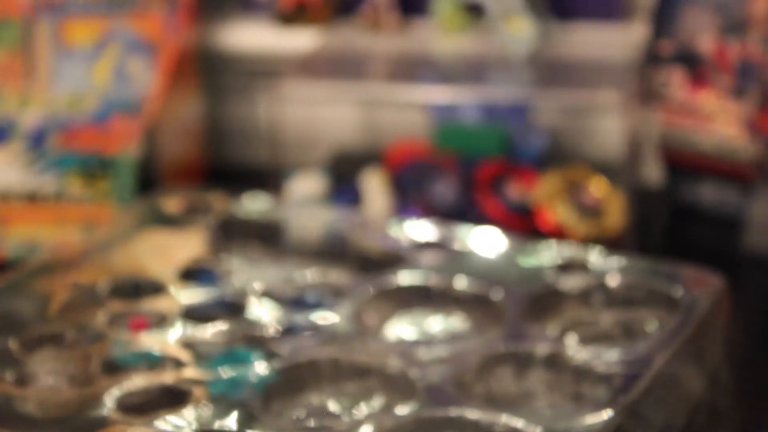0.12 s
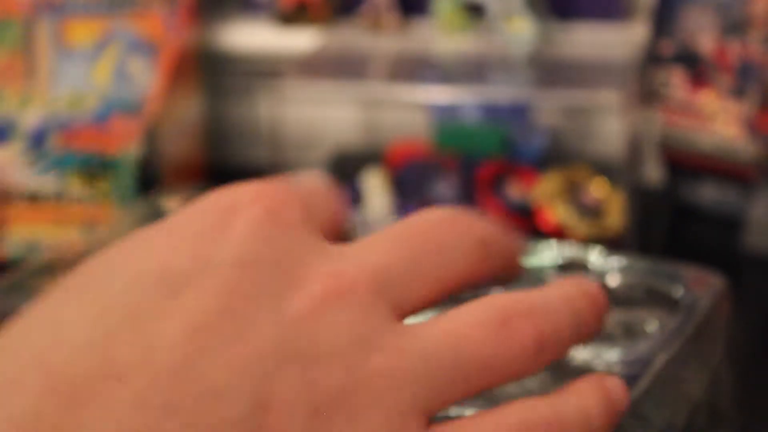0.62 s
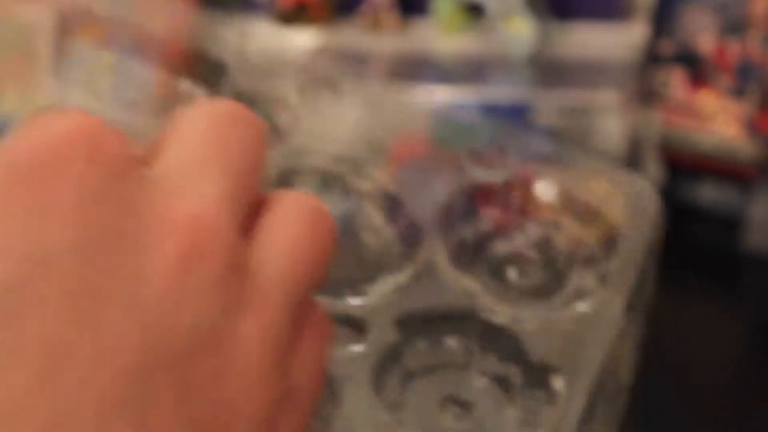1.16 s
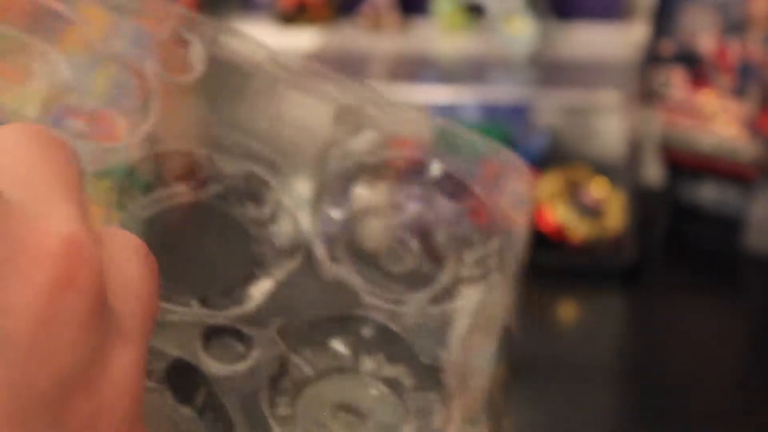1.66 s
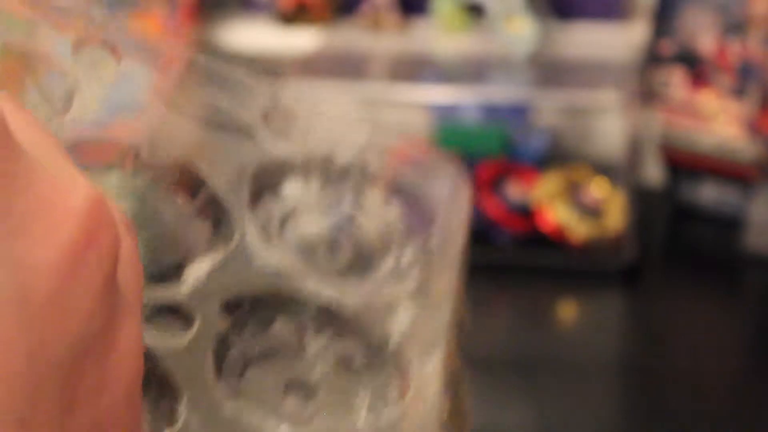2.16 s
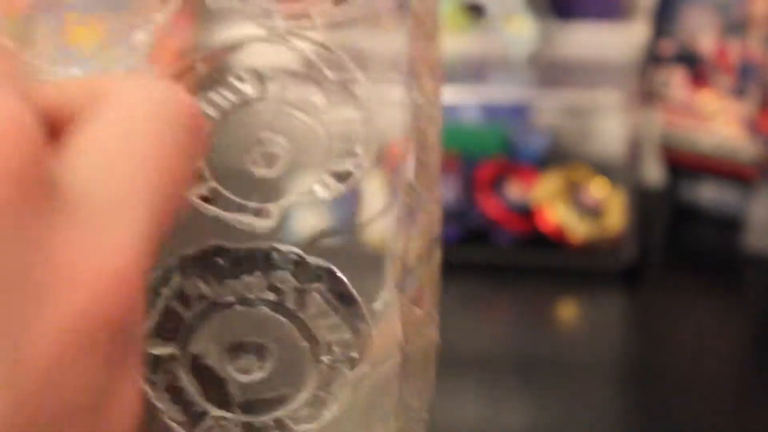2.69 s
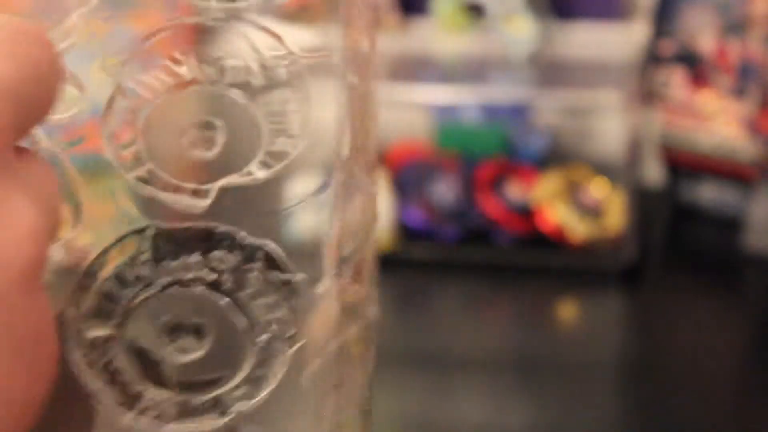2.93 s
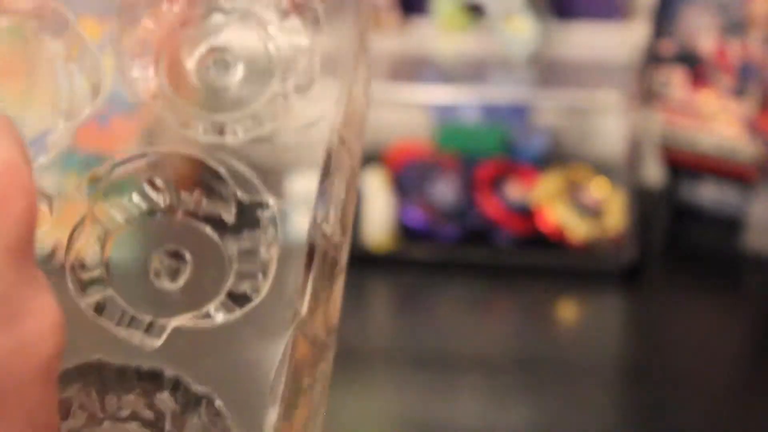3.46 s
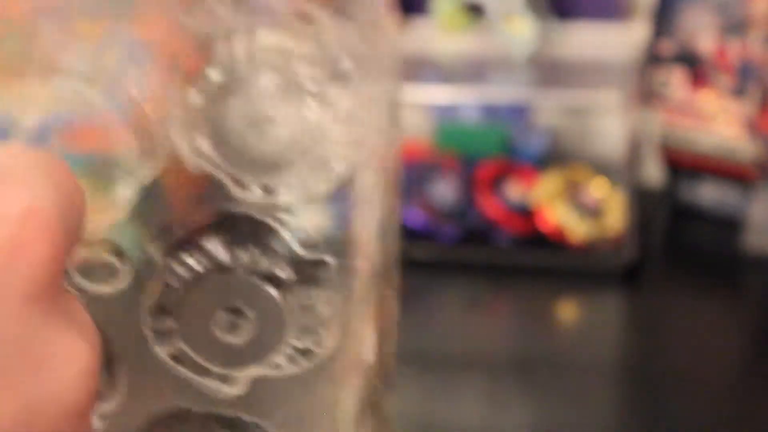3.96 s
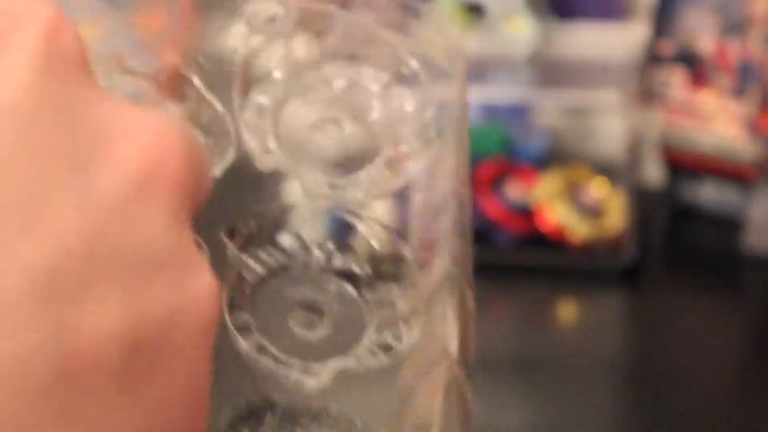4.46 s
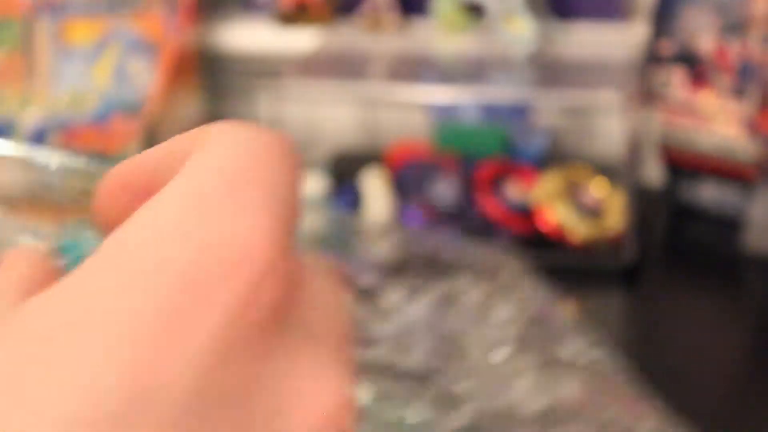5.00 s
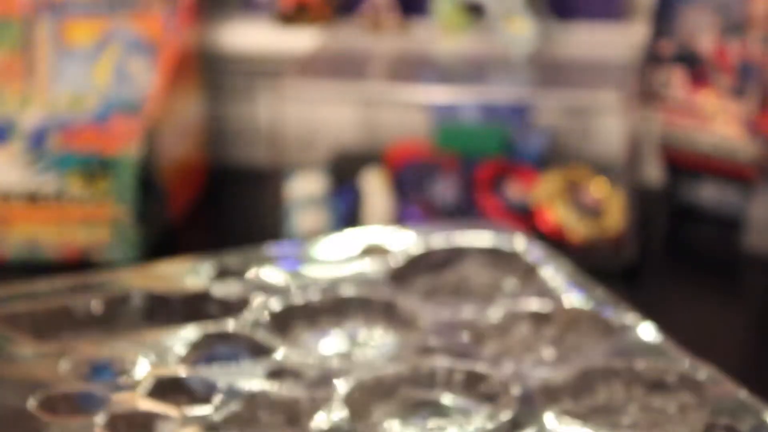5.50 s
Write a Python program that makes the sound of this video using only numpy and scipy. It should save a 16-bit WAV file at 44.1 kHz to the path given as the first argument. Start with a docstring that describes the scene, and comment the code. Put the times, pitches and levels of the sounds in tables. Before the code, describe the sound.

Thin moulded plastic tray is gripped, flexed and tilted close up, with bright snaps, hollow knocks, squeaky rubbing and a clattering set-down over faint hiss.

```python
"""Bright snaps, dull booming knocks and ticks are heard over rubbing and squeaks, with a hiss behind them.
A thin moulded plastic tray is gripped, tilted, flexed and set down on a table, close to a camera in a small room.
Each blow is a push and a burst of noise ringing in the tray; fingers and skin are noise broken into jerks.
The camera adds its hiss, turns its gain down after loud blows and flattens the highest peaks."""
import sys
import numpy as np
from scipy import signal
from scipy.fft import rfft, irfft, next_fast_len
from scipy.io import wavfile
from scipy.ndimage import uniform_filter1d, minimum_filter1d, map_coordinates

SR = 44100
rng = np.random.default_rng(int(sys.argv[2]) if len(sys.argv) > 2 else 0)


def linear_from_db(decibels):
    """Turn decibels (scalar or array-like) into linear amplitude factors; 0 gives 1."""
    return 10 ** (np.asarray(decibels, float) / 20)


def generate_wav(signal):
    """Clip the signal to [-1, 1] and save it as 16-bit WAV at the path in sys.argv[1]."""
    frames = np.transpose(np.atleast_2d(signal))
    scaled = np.clip(frames, -1, 1) * 32767
    pcm = np.round(scaled).astype(np.int16)
    wavfile.write(sys.argv[1], SR, pcm)


N = 247920

# Dents that buckle with a bright snap. Each row: start in seconds, crack level in dB,
# boom in dB above the crack, sizzle in dB above the crack, pitch of the dent in Hz.
SNAPS = [(0.084, -15.5, -1.5, -7.5, 1300), (0.2768, -29, 2.5, 0, 7540), (0.2871, -21.5, -12, -5, 2100),
         (0.2893, -10.5, -14, -1, 3080), (0.3246, -12.5, -10.5, -0.5, 3120), (1.141, -10.5, -23, -16, 3650),
         (1.2372, 0.5, 5.5, -13, 3650), (1.6078, -23.5, 4, -9.5, 1660), (1.7708, -34, 3, -9, 4310),
         (1.885, -7.5, -4, -0.5, 5600), (1.9663, -6, 9, 5.5, 4170), (2.637, -18.5, -2, -2, 2004),
         (2.6717, -16, 2, -3, 2450), (3.2674, -28.5, 9, -9, 1790), (3.471, -24.5, -10, -16, 2030),
         (3.6633, 0, 4, -8, 1120), (3.9015, -16.5, 5, 0, 6100), (3.9127, -6.5, 4, -11.5, 2200),
         (4.0515, -23.5, 8, 1.5, 1270), (4.0796, -13.5, -1, -14, 2600), (4.1988, -26, 8, -11, 2550),
         (4.2445, -19.5, 6.5, -9, 2560), (4.383, -30.5, 4, -4, 1440), (5.1316, -16.5, -11, 3, 2910),
         (5.5183, -19, 16.5, -3, 1360)]
# Duller contacts of parts, fingers and table, from ticks to scuffs. Each row: start in seconds, crack level in dB,
# boom in dB above the crack, pitch in Hz, rough time in seconds for the burst to die by 60 dB.
KNOCKS = [(0.7863, -30.5, 15, 1290, .086), (0.8024, -18, 13.5, 1180, 0.044),
          (0.8385, -34, 22.5, 1120, 0.044), (0.8741, -40, 12, 1250, .057), (0.9158, -20, 7.5, 4450, .066),
          (0.9264, -14.5, 3.5, 3370, 0.08), (0.9384, -12, -2.5, 1280, 0.072),
          (0.9666, -21.5, 1.5, 1196, 0.099), (1.0442, -30.5, 11.5, 1400, 0.15),
          (1.077, -24.5, 2, 1890, 0.061), (1.1366, -23, -16, 4000, .054), (1.1792, -20, 3.5, 1370, 0.049),
          (1.335, -15, -7, 2130, .082), (1.347, -10, 3.5, 2080, 0.04), (1.3753, -14, 2.5, 1980, .047),
          (1.39, -21.5, 13.5, 2570, 0.033), (1.6574, -33.5, 14, 1270, 0.038),
          (1.8288, -18.5, 5.5, 2000, 0.043), (2.1306, -18.5, -6, 5200, 0.11),
          (2.455, -25, 7.5, 5350, 0.046), (2.4845, -21, -3, 2180, 0.053), (2.846, -29, 3.5, 2050, 0.066),
          (2.8666, -27, 1.1, 2050, 0.043), (2.881, -24.5, 3.5, 1970, 0.087), (2.911, -26, 7.5, 3220, .026),
          (2.948, -26, 2.5, 3220, 0.025), (2.9942, -32, -17, 3300, 0.035), (3.0489, -26.5, -2, 2520, 0.016),
          (3.0764, -29, 4, 2970, 0.027), (3.158, -37, 1, 2120, .035), (3.1831, -23, -0.5, 2580, 0.027),
          (3.1903, -21.5, -5, 4050, .011), (3.203, -20.5, -20, 1360, 0.033), (3.2206, -18, -15, 1300, .015),
          (3.2368, -31, 8, 1720, 0.054), (3.344, -43, 18, 1120, 0.042), (3.4033, -27, 6, 3000, 0.024),
          (3.4209, -29.5, 8, 2700, 0.048), (3.4849, -21.5, -6.5, 3600, .015),
          (3.5243, -28.5, 8.5, 1370, 0.054), (3.5326, -19.5, -13, 1290, .025),
          (3.5488, -17.5, -9, 2060, 0.04), (3.5612, -17, -3.5, 4300, .014), (3.582, -8.5, -8, 4200, 0.02),
          (3.6097, -10, -3.3, 4160, 0.018), (3.6337, -14, -14, 2120, .026),
          (3.715, -2.5, -7.5, 2190, 0.016), (3.794, -25, -4, 1370, .034), (3.8544, -40, 18, 2430, .028),
          (3.874, -26.5, 10, 1100, 0.16), (3.985, -39, 17, 1120, 0.029), (4.0687, -18.5, 4, 3900, 0.039),
          (4.6676, -31, -1, 1940, 0.029), (4.73, -29.5, -4.5, 2150, 0.042), (4.8296, -23, -11, 2100, 0.019),
          (4.8409, -34, -10, 3340, 0.031), (4.9062, -11.5, 3.5, 1490, 0.1), (4.9652, -19, 4.5, 4300, 0.019),
          (5.0434, -9, 6.5, 1950, 0.045), (5.0696, -23, 13.5, 3540, 0.12), (5.0992, -13, 1.5, 3000, .082),
          (5.1812, -14, -13, 3160, 0.098), (5.2075, -14, 3.5, 3200, 0.097), (5.1587, -19, -2, 1890, 0.046),
          (5.2274, -19, 5, 1360, 0.022), (5.2654, -19, 8.5, 1400, 0.079), (5.3343, -16.5, 8.5, 1830, 0.06),
          (5.369, -26, 21.5, 1270, 0.025), (5.3894, -24.5, 20.5, 1120, 0.064), (5.443, -12, 14, 2280, .032),
          (5.4536, -13, 13, 1120, 0.034), (5.4824, -16, 17.5, 1180, 0.09)]
# The hands at work. Each row: time in seconds, flexing level in dB, rubbing level in dB.
HANDS = [(.76, -90, -90), (.8, -31, -39.5), (.966, -16, -26), (1.13, -33.5, -45.5), (1.3, -19, -27),
         (1.42, -29, -44.5), (1.8, -24, -28), (1.95, -35.5, -30), (2.14, -29, -24.5), (2.29, -34, -39),
         (2.66, -31, -30.5), (2.8, -41, -46), (2.95, -43.5, -51), (3.14, -38.5, -47.5), (3.224, -27, -30.5),
         (3.45, -45.5, -87), (3.53, -32, -37), (3.97, -34, -52), (4.2, -34, -51), (4.36, -48.5, -74),
         (4.68, -42.5, -42), (5.02, -39, -45), (5.06, -15, -29.5), (5.13, -17.5, -14.5), (5.29, -12, -32),
         (5.32, -25, -25.5), (5.39, -7.5, -42), (5.5, 0, -24.5), (5.62, -25, -44)]
# Resonances of the moulded ribs under the fingers. Each row: pitch in Hz, width in Hz, relative level in dB.
RIBS = [(1350, 674, 6.5), (2150, 405, 6.5), (2620, 115, 6.5), (3650, 1870, 0.5), (4075, 250, 4.5),
        (4830, 400, -9), (5600, 990, -3.5), (7450, 1400, -17.5)]


def unit(x):
    """Scales to rms 1 along the last axis."""
    return x / np.sqrt(np.mean(x ** 2, axis=-1, keepdims=True) + 1e-20)


def along(points, hz):
    """Reads a curve of (Hz, value) points on a log frequency axis."""
    f, v = np.transpose(points)
    return np.interp(np.log(hz + 1), np.log(f + 1), v)


def filtered(x, response):
    """Shapes the spectrum of x by a response that is a function of frequency."""
    m = next_fast_len(x.shape[-1] + SR // 8)
    spectrum = rfft(x, m) * response(np.fft.rfftfreq(m, 1 / SR))
    return irfft(spectrum, m)[..., :x.shape[-1]]


def resonance(f, hz, width):
    """One resonance that rings only after it is struck."""
    return 1j * f * width / (hz * hz - f * f + 1j * f * width)


def body(modes):
    """Sums the resonances of a body, their signs alternating."""
    return lambda f: sum((-1) ** k * linear_from_db(db) * resonance(f, hz, w) for k, (hz, w, db) in enumerate(modes))


def wobble(rate):
    """A smooth random curve through so many random points a second."""
    points = rng.standard_normal(int(N * rate / SR) + 4)
    return map_coordinates(points, [np.arange(N) * rate / SR])


def slips(rate, spread_db, life):
    """Stick-slip: jerks of uneven size, so many a second, each dying away over its life in seconds."""
    size_db = np.minimum(spread_db * rng.exponential(size=N), 3 * spread_db)
    jerks = (rng.random(N) < rate / SR) * linear_from_db(size_db)
    return unit(signal.lfilter([1], [1, -np.exp(-1 / (life * SR))], jerks))


def patchy(x, depth_db):
    """Fine resonances that drift as the contact moves."""
    z = signal.stft(x, nperseg=512)[2]
    field = uniform_filter1d(rng.standard_normal(z.shape), size=3, axis=0)  # smooth over pitch
    field = uniform_filter1d(field, size=24, axis=1)  # smooth over time
    return signal.istft(z * linear_from_db(depth_db * field / field.std()), nperseg=512)[1][:N]


def course(rows):
    """One value per sample for each column after the time."""
    s, *columns = np.transpose(rows)
    return [np.interp(np.arange(N) / SR, s, c) for c in columns]


def swell(start, loudest, end, db):
    """A glide rises to its peak, sinks and fades out."""
    edge_db = -11.5  # both ends against the peak
    now = np.arange(N) / SR
    fade = np.interp(now, [start - .03, start, end, end + 0.026], [0, 1, 1, 0])
    return fade * linear_from_db(db + np.interp(now, [start, loudest, end], [edge_db, 0, edge_db]))


def tails(count):
    """Room answers of energy 1, a few ms late, each frequency dying at its own speed."""
    # Each row: frequency in Hz, time in seconds to die by 60 dB.
    room = [(150, 0.28), (500, 0.14), (2000, 0.19), (7000, 0.093), (15000, 0.085)]
    hz, t, z = signal.stft(rng.standard_normal((count, SR // 3)), SR, nperseg=256)
    tail = signal.istft(z * linear_from_db(-60 * t / along(room, hz)[:, None]), SR, nperseg=256)[1]
    tail = tail / np.linalg.norm(tail, axis=1, keepdims=True)
    return np.pad(tail, ((0, 0), (SR // 300, 0)))


def floor():
    """Low room hum under the hiss of the camera: steady noise with a shaped spectrum."""
    # Each row: frequency in Hz, relative level per Hz in dB.
    hiss = [(15, -30), (30, -31), (45, -23), (62, -2), (85, -3.5), (120, -12.5), (300, -10.5), (800, -10.5),
            (1230, -13.5), (4000, -18), (8600, -24.5), (16000, -26)]
    noise = filtered(rng.standard_normal(N), lambda f: linear_from_db(along(hiss, f)))
    return linear_from_db(-42.5) * unit(noise)


def tray(x, when):
    """The hollow tray's answer, its groups of resonances at the levels that the grip allows."""
    # Resonances of the tray. Each row: pitch in Hz, width in Hz, relative level in dB.
    modes = [(88.5, 31, -23), (157, 44, -9), (203.7, 85, -7.5), (290, 59, -5.5), (371.4, 37, -0.5),
             (444.4, 48.7, -2), (540.6, 66.2, 4), (636, 132, -1), (861, 183, -8), (1080, 241, -10.5),
             (1236, 172, -9)]
    # Grip and tilt decide which resonances are free.
    # Each row: time in seconds, level of the deep group in dB, of the middle group in dB, of the upper group in dB.
    grip = [(.09, -4, 7.5, 14.5), (.3, -11, 4, 13.5), (.8, -2.5, 0.2, -0.8), (1.02, -13, -8, -1),
            (1.3, 5, 0.7, 1.5), (1.8, -3.5, 2.5, 2.8), (2.2, -3, -1.2, 4), (2.7, 6, 1.5, 4.5),
            (3.3, 5, .4, 0.5), (3.65, -1, -5.5, 8.5), (3.9, 7.5, -4, 0.8), (4.1, -1.5, -5, 4),
            (4.25, 11.5, 4, 1), (5.1, -5, -0.1, 0.9), (5.3, 3, 2.5, 1.3), (5.62, 7, 6.5, -5)]
    s, *levels = np.transpose(grip)
    deep_db, middle_db, upper_db = [np.interp(when, s, c) for c in levels]
    deep = linear_from_db(deep_db) * filtered(x, body(modes[:3]))
    middle = linear_from_db(middle_db) * filtered(x, body(modes[3:6]))
    always_free = filtered(x, body(modes[6:8]))
    upper = linear_from_db(upper_db) * filtered(x, body(modes[8:]))
    return deep - middle + always_free + upper


def squeak(start, loudest, end, db, hz):
    """The film sings: a narrow band of noise that swells and fades."""
    width = 0.091 * hz
    band = lambda f: 1 / (1 + (2 * (f - hz) / width) ** 2)
    return swell(start, loudest, end, db) * unit(filtered(rng.standard_normal(N), band))


def shivering(now):
    """After each blow the tray goes on rustling, under its boom; the rustle dies away."""
    t60_s, top_db = 0.34, -5.5
    total = 0
    for s, db, boom_db, *_ in [*SNAPS, *KNOCKS]:
        level_db = min(db + boom_db, top_db)
        total = total + (now > s) * linear_from_db(level_db - 60 * np.abs(now - s) / t60_s)
    return total


def hands():
    """Flexing shakes the tray, fingers judder over ribs, skin slides on film; grit breaks friction into jerks."""
    # Skin gliding over the film. Each row: start, loudest moment and end in seconds, peak level in dB.
    slides = [(.25, .3, 0.5, -44), (.8, .85, 1.12, -41.5), (1.5, 1.85, 2.1, -42), (2.07, 2.14, 2.37, -26),
              (2.096, 2.41, 2.54, -28.5), (2.44, 2.632, 2.7, -31.5), (5.074, 5.12, 5.25, -22.5),
              (5.3, 5.45, 5.9, -42)]
    # Bands that sing in the film. Each row: start, loudest moment and end in seconds, peak level in dB, pitch in Hz.
    squeaks = [(1.52, 1.75, 2.2, -40.5, 4640), (2.02, 2.146, 2.11, -23.5, 5130),
               (2.02, 2.06, 2.4, -35, 2270), (2.14, 2.5, 2.54, -31.5, 2250), (2.12, 2.25, 2.5, -33, 11200),
               (3.19, 3.245, 3.28, -29, 920)]
    # Colour of sliding skin. Each row: frequency in Hz, relative level per Hz in dB.
    skin = [(700, -42), (1200, -11), (2000, -11), (2700, 0.5), (3400, -6), (5000, -4), (7000, -4.5),
            (9300, -8), (11000, -9.5), (13000, -12), (15300, -15.5), (16500, -31)]
    grip_grit, slide_grit = 0.71, 0.12  # share of jerks when gripping and when gliding, 0 to 1
    now = np.arange(N) / SR
    flex_db, rub_db = course(HANDS)
    shiver = shivering(now)
    glide = sum(swell(*row) for row in slides)

    gripping = linear_from_db(2 * rub_db) / (linear_from_db(2 * rub_db) + (4 * glide) ** 2)  # 1 = only rubbing, 0 = only gliding
    grit = np.clip(slide_grit + (grip_grit - slide_grit) * gripping, 0, 1)
    contact = 1 - grit + grit * slips(140, spread_db=2, life=.004)
    scuffs = 0.62 + 0.39 * slips(70, spread_db=2.5, life=0.0065)
    noise = rng.standard_normal((3, N))

    flex_level = (linear_from_db(flex_db) + linear_from_db(-19.5) * shiver) * linear_from_db(2.47 * wobble(30))
    flex = flex_level * unit(tray(patchy(noise[0], depth_db=2.5) * scuffs, now))
    rub_level = (linear_from_db(rub_db) + linear_from_db(-30.5) * shiver) * linear_from_db(4.7 * grit * wobble(45))
    rub = rub_level * unit(filtered(noise[1] * contact, body(RIBS)))
    skin_noise = filtered(noise[2], lambda f: linear_from_db(along(skin, f)))
    slide = glide * unit(contact * patchy(skin_noise, depth_db=1.6))
    dry = flex + rub + slide + sum(squeak(*row) for row in squeaks)
    return dry + linear_from_db(-10) * signal.fftconvolve(dry, tails(count=1)[0])[:N]


def contacts():
    """Rows of start s, crack dB, boom and sizzle dB above it, Hz, burst s: snaps, knocks and random crackle."""
    rows = []
    for s, db, boom_db, sizzle_db, hz in SNAPS:
        heavy_db = max(db + boom_db + 6, 0)  # snaps whose boom passes -6 dB last longer
        rows.append((s, db, boom_db, sizzle_db, hz, .031 + .0016 * heavy_db))
    for s, db, boom_db, hz, t60 in KNOCKS:
        rows.append((s, db, boom_db, -28.5 - 0.35 * db, hz, t60))  # sizzle grows less than the crack
    # 50 small ticks at random times, as loud as the rubbing or up to 2 dB louder
    rub_db = course(HANDS)[1]
    for when, size, pitch, boom in rng.random((50, 4)):
        at = int(when * N)
        rows.append((at / SR, rub_db[at] + 2 - 2 * size, 12 * boom - 4, -12, 2200 * 3 ** (pitch - .5), .03))
    return np.array(rows)


def top(x):
    """Scales each row so that its loudest 2.5 ms has rms 1."""
    return x / np.sqrt(uniform_filter1d(x ** 2, size=SR // 400, axis=1).max(axis=1, keepdims=True))


def snaps():
    """Snaps, knocks and ticks: a sharp push and a dying burst, heard as crack, sizzle and boom of the tray."""
    # Colour of the sizzle on top of a snap. Each row: frequency in Hz, relative level per Hz in dB.
    sizzle_colour = [(4000, 2.5), (7000, 3.5), (11000, -3), (15500, -7), (20000, -17)]
    s, db, boom_db, sizzle_db, hz, t60 = contacts().T[:, :, None]
    t60 = np.clip(t60, .006, .2)
    t = np.arange(SR // 5) / SR
    noise = rng.standard_normal((len(s), 3, len(t)))
    burst = lambda life: linear_from_db(-60 * t / life) * (1 - np.exp(-60 * t / life / .5))
    push = (0.036 / t60) ** 2 * np.exp(-t / .00006)  # the shorter the contact, the more it is a single push

    def dent(f):
        """The dent rings at its own pitch; a small one does not reach the lower ribs."""
        reach = (1j * f / (1j * f + .7 * hz)) ** 2
        return body(RIBS)(f) * reach + linear_from_db(2) * resonance(f, hz, .4 * hz)

    crack = top(filtered(2.08 * push + noise[:, 0] * burst(0.91 * t60), dent))
    bright = filtered(noise[:, 1], lambda f: linear_from_db(along(sizzle_colour, f)))
    sizzle = top(bright * (1.06 + np.exp(-t / 0.0012)) * burst(0.96 * t60))
    boom = top(tray(4.5 * push + noise[:, 2] * burst(1.2 * t60), s))
    # a short low thump under each blow, as overloaded peaks give
    thump = linear_from_db(-30) * (1 - t / 0.0043) * t / 0.011 * np.exp(1 - t / 0.0053)
    dry = linear_from_db(db) * (crack + linear_from_db(sizzle_db) * sizzle + linear_from_db(boom_db) * (boom + thump))
    wet = linear_from_db(-7.0) * signal.fftconvolve(dry, tails(count=len(s)), axes=1)
    wet[:, :len(t)] += dry
    # add every blow at its own start
    at = np.round(s * SR).astype(int) + np.arange(wet.shape[1])
    return np.bincount(at.ravel(), wet.ravel(), N)[:N]


def scene():
    """Blows, working hands and background together, in one channel."""
    return (snaps() + hands() + floor())[None]


def low_pass(x):
    """Removes everything above the highest recorded frequency."""
    return signal.sosfilt(signal.butter(12, 16330, fs=SR, output="sos"), x)


def record(dry):
    """The camera's gain sinks by up to 6 dB after loud blows, holds and creeps back; high peaks are flattened."""
    hold, ease = round(.2 * SR), round(.1 * SR)  # 0.2 s and 0.1 s, in samples
    loud = np.sqrt(np.abs(uniform_filter1d(dry ** 2, size=SR // 200)))
    need = np.clip((.7 / (loud + 1e-9)) ** 2, linear_from_db(-6), 1)
    # both windows look back only, so the gain follows the blow
    held = minimum_filter1d(need, hold, origin=(hold - 1) // 2)
    x = dry * uniform_filter1d(held, ease, origin=(ease - 1) // 2)
    x = x / (1 + np.abs(x) ** 12) ** (1 / 12)  # bends over just below full scale
    return low_pass(x)


dry = scene()
out = record(dry)
generate_wav(out)
```